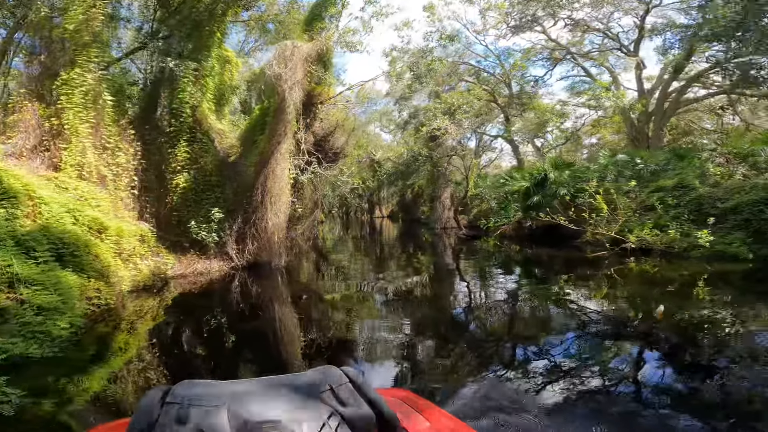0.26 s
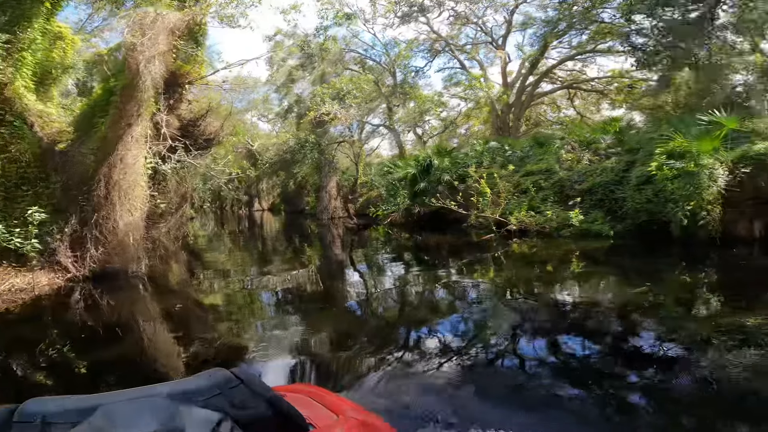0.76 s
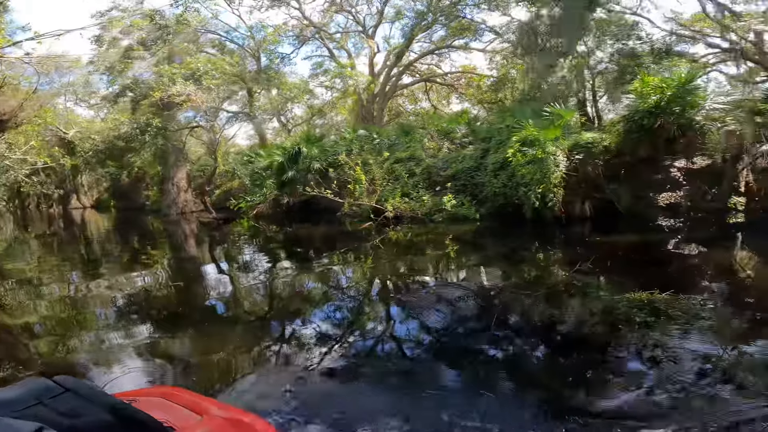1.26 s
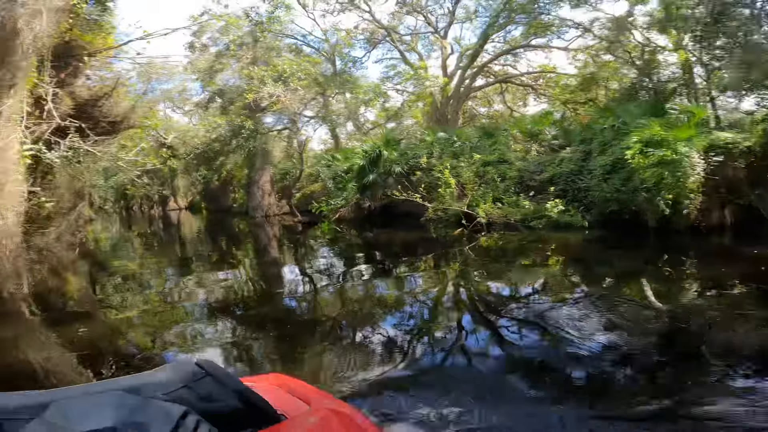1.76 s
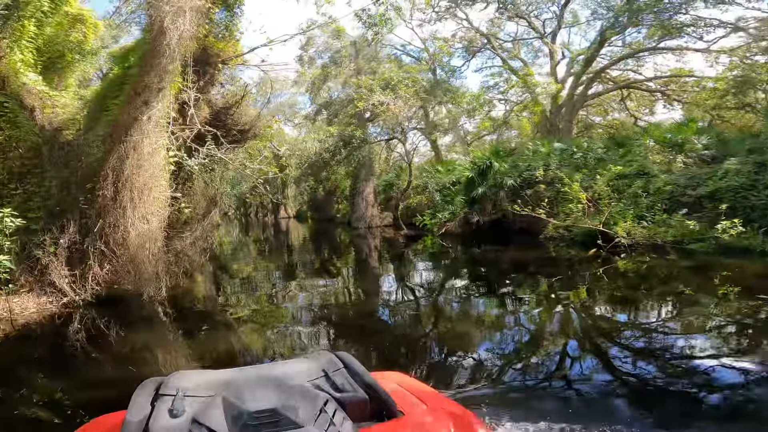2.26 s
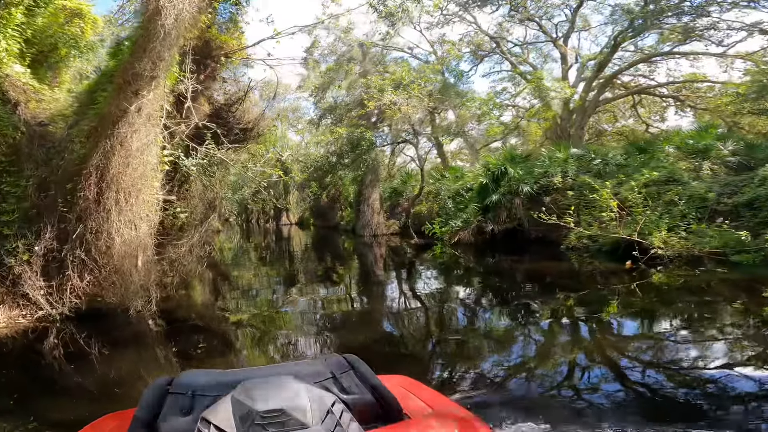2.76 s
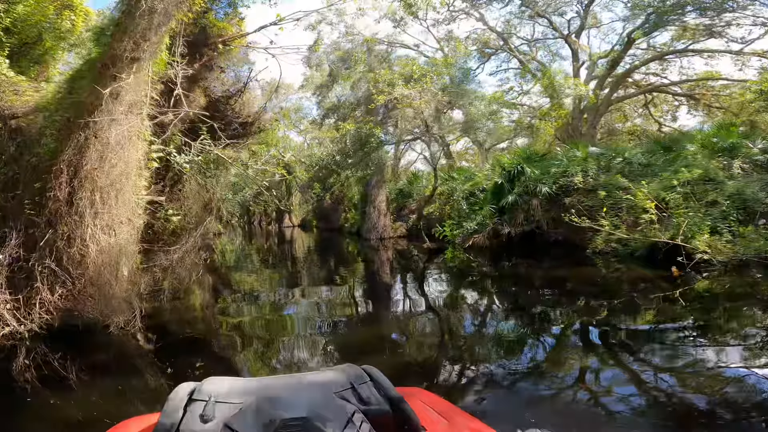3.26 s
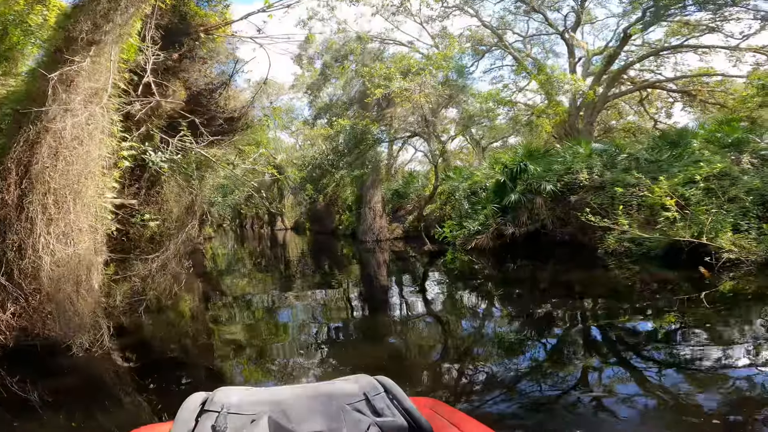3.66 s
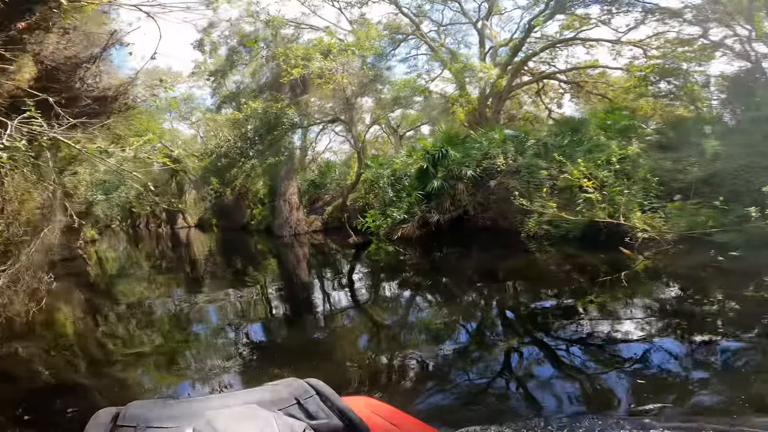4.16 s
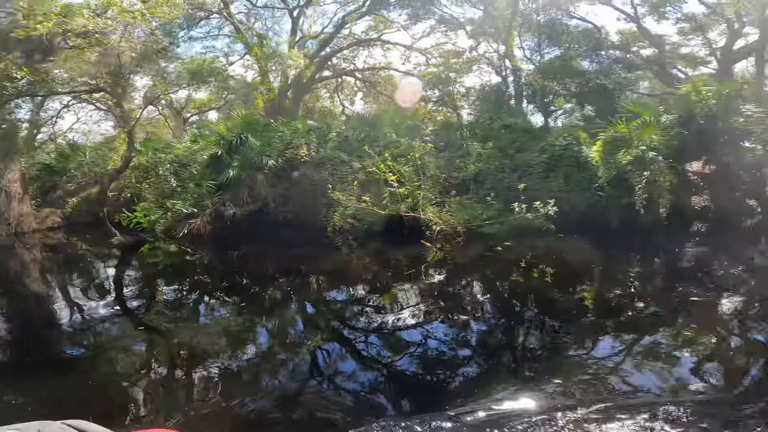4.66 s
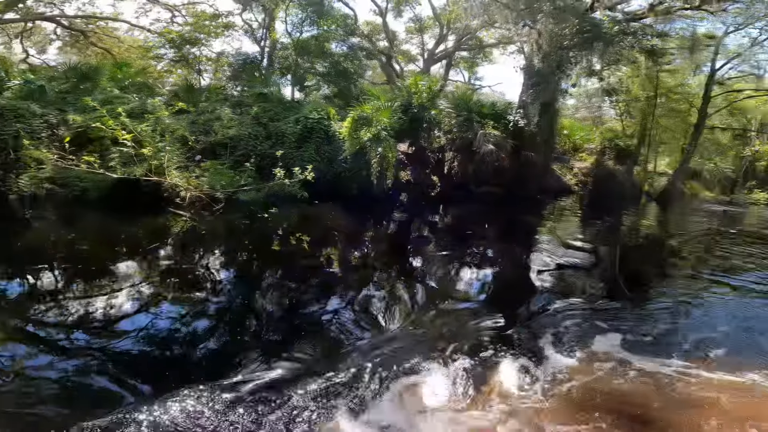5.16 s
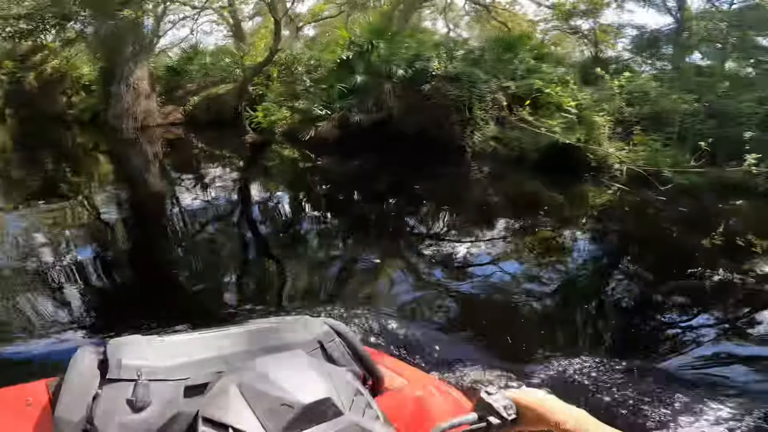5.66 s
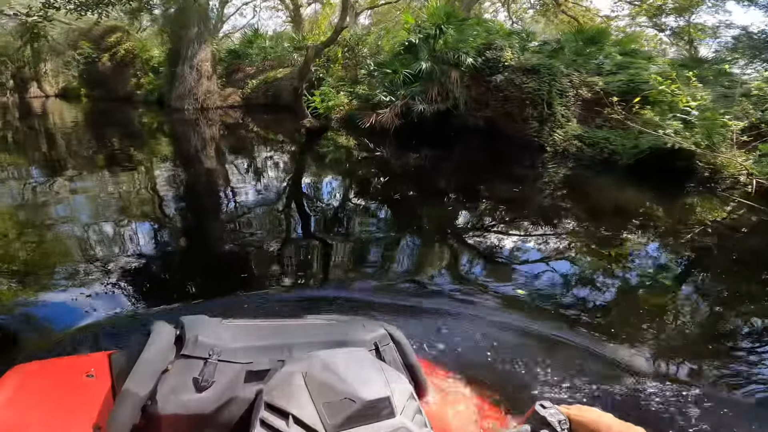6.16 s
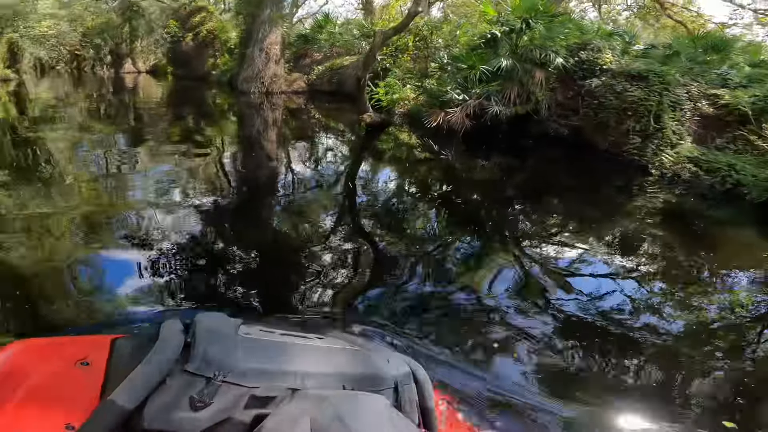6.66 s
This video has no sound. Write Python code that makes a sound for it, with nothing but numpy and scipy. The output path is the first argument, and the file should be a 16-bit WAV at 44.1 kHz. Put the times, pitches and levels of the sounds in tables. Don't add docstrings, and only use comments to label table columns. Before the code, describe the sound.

Close on-vehicle microphone outdoors. A muffled mono engine hum opens into wide stereo at about one second as a two-cylinder quad labours through deep water: rapid drowned exhaust thuds, gritty intake roar, churned water, bubbles and belt rasp. The load falls away after four seconds, leaving a quiet hum and a few hard plastic knocks; then water rushes back with tiny spray ticks and the engine revs up.

```python
import sys
import numpy as np
from scipy import signal
from scipy.fft import rfft, irfft, next_fast_len
from scipy.io import wavfile
from scipy.ndimage import uniform_filter1d, map_coordinates

SR = 44100
rng = np.random.default_rng(int(sys.argv[2]) if len(sys.argv) > 2 else 0)


def file_out(sig):
    cols = np.atleast_2d(sig).T
    lim = np.clip(cols, -1, 1)
    pcm = np.round(lim * 32767).astype(np.int16)
    wavfile.write(sys.argv[1], SR, pcm)


def invert_db(level):
    return 10 ** (np.asarray(level, dtype=float) / 20)


N = 304290

# start_s, length_s, stereo_share_change
WIND_FADES = [
    (0.898, .12, 0.79),
    (5.017, 0.47, -0.97),
    (5.623, 0.12, .9),
]
# time_s, level_db, length_s
FADE_DIPS = [
    (.96, -3, 0.13),
    (5.07, -6, 0.15),
]
# freq_hz, level_db, phase_rad, likeness_0to1
SIDE = [(40, -8, 0, .95), (110, -7, 0.0012, 0.96), (170, 0.5, -1.5, 0.76), (260, 0, -1.75, 0.93),
        (800, 1, -1.81, 1), (1600, -2.5, -1.18, .9), (2100, -9, -.9, 0.9), (2600, -9.5, -.1, 0.96),
        (4500, -1, -.1, 0.78), (8000, 2, 0, 0.95)]
# freq_hz, level_db (per Hz)
PORT_HISS = [(9000, -70), (10800, -32.5), (11600, -6.5), (12000, 1.5), (12600, 2), (13100, -12.5),
             (14200, 0.5), (15600, -8.5)]
# time_s, peak_db
DROPLETS = [(0.4885, -73.5), (0.5442, -87), (1.3457, -50.5), (3.7704, -50.5), (4.0423, -54.5),
            (5.2016, -74), (5.437, -80), (5.7956, -59), (5.9463, -55.5), (6.065, -49.5), (6.174, -48.5),
            (6.313, -62), (6.517, -43.5), (6.6014, -49.5), (6.656, -67), (6.8757, -45.5)]
# time_s, peak_db, t60_s
PANEL_KNOCKS = [
    (5.302, -48, 0.017),
    (5.415, -32, 0.025),
    (5.626, -41, 0.06),
    (5.638, -33.5, 0.06),
    (5.651, -33.5, 0.063),
    (5.662, -37, 0.013),
    (5.666, -30, 0.028),
]
# freq_hz, width_hz, level_db
PANEL_MODES = [(850, 66, -3.5), (1400, 65, 8), (1777, 140, 7), (2820, 110, -7), (4100, 500, -27)]
# freq_hz, width_hz, level_db
CASE_MODES = [(1207, 25, -2), (1442, 79, 6.5), (1544, 450, 0), (1920, 220, -5), (2593, 550, -38.5)]
# time_s, level_db, length_s
BELT_SLIPS = [
    (2.75, 3, 0.092),
    (3.48, 7.5, 0.19),
    (3.85, 8.5, .2),
    (6.8, 9, 0.47),
]
# freq_hz, level_db (per Hz)
SPRAY_COLOUR = [(1060, -14), (1800, -2.5), (2180, -8.5), (2940, -11), (4970, -22), (7650, -27.5),
                (9890, -33.5), (11000, -30), (14300, -73), (22000, -120)]
# freq_hz, level_db (per Hz)
ROAR_COLOUR = [(180, -27), (300, 0.5), (455, -4.5), (570, -2.5), (818, -6.5), (1080, -6), (1270, -10.5),
               (1510, -10), (2600, -32), (3380, -62), (5720, -120)]
# start_s, end_s, start_hz, end_hz, level_db
HOLLOWS = [(1.334, 1.762, 1031, 1052, -49.5), (1.589, 3.098, 551, 575.3, -39.5),
           (2.207, 3.098, 1518, 1522, -48.5), (3.046, 4.21, 850, 943, -38.5),
           (3.215, 3.623, 1692, 1641, -41), (3.285, 4.275, 595.4, 574, -43.5),
           (3.817, 4.307, 1509, 1508, -43), (4.21, 4.973, 1125, 1088, -56),
           (1.15, 1.367, 4730, 4520, -59.5), (6.005, 6.894, 997, 1178, -49), (6.78, 6.86, 3460, 3500, -47),
           (5.715, 5.95, 897, 850, -53)]
# time_s, pitch_hz, peak_db
BIG_BUBBLES = [(1.411, 1075, -28.5), (1.452, 1020, -39), (1.497, 1000, -34), (1.538, 1100, -41),
               (1.615, 1040, -30.5), (1.652, 1030, -27.5), (1.935, 664, -24), (1.969, 620, -27.5),
               (2.168, 757, -25), (2.285, 693, -23.5), (3.297, 890, -31), (4.361, 870, -33.5)]
# time_s, exhaust_effort_db, water_flow_db, camera_nearness_to_frame_db
RIDE_LEVELS = [(0, -31, -56.5, -33.5), (.84, -29, -59.5, -36.5), (1.02, -36, -53, -37),
               (1.2, -28, -44, -38.5), (1.5, -22, -40.5, -37), (2.04, -21, -36.5, -35.5),
               (2.9, -20.5, -35, -35.5), (3.3, -21.5, -35, -40), (4.05, -19, -33.5, -36),
               (4.3, -24.5, -39.5, -43), (4.6, -38.5, -48.5, -48), (4.95, -48, -57.5, -44.5),
               (5.25, -45, -65.5, -43.5), (5.55, -44.5, -65, -41.5), (5.86, -45.5, -46, -44),
               (6.15, -38, -39.5, -37.5), (6.5, -41.5, -37, -36), (6.9, -29.5, -33.5, -31)]
# time_s, cycle_rate_hz, firing_scatter_db (from water choking the pipe)
ENGINE_SPEED = [(0, 25.85, 1), (.65, 25.75, .9), (1.05, 26.65, .9), (1.35, 25.8, .8), (1.5, 24.9, .8),
                (2.4, 25.5, .9), (2.72, 25.9, 1.3), (2.95, 25.2, 1.3), (3.35, 20.7, 1.4), (3.7, 24, 1.3),
                (3.92, 24.9, 1.2), (4.33, 23.85, 2), (4.95, 26.65, 2.6), (5.5, 25.85, 2.6), (6, 25.55, 2.3),
                (6.45, 27, 2.1), (6.9, 29.5, 2.2)]
# time_s, level_db
WEAK_FIRINGS = [
    (2.558, -4),
    (2.678, -4.5),
    (3.328, -6),
    (3.46, -11),
    (3.629, -4),
    (4.121, -0.5),
    (4.251, -16.5),
    (4.489, -5),
    (4.531, -1.5),
]
# time_s, level_db, length_s
PIPE_GULPS = [(2.56, -1, 0.014), (2.71, 0, .03), (2.92, -0.5, 0.033), (3.2, -3.5, 0.02),
              (3.35, -3.5, 0.019), (3.44, 1.5, 0.041), (3.51, -6, 0.021), (3.63, -1, 0.02),
              (4.13, -6, 0.016), (4.25, 1, 0.022), (4.5, -2, .03), (4.57, 5.5, .03), (4.67, -4, 0.061),
              (4.8, 6.5, 0.031), (5.68, 2, 0.12), (5.77, -5.5, .03), (5.92, 5, 0.04), (6.17, -1, .03),
              (6.33, 2.5, .04), (6.48, 1, .04), (6.71, 2.5, 0.017), (6.82, -5.5, 0.053)]
# freq_hz, width_hz, level_db
PIPE_MODES = [(92, 14, -13), (146, 46, 0), (152, 31, .8)]
# freq_hz, width_hz, level_db
MOUTH_MODES = [(258, 20, 0), (335, 80, -15)]
# freq_hz, width_hz, level_db
FRAME_MODES = [(25.8, 26, -6), (60.5, 11, 6), (97, 31, -1)]

USUAL_HZ = 25.7
TOP_HZ = 15730


def unit(x):
    return x / np.sqrt(np.mean(x ** 2) + 1e-20)


def curves(rows):
    s, *cols = np.transpose(rows)
    return [np.interp(np.arange(N) / SR, s, c) for c in cols]


def along(rows, hz):
    f, *cols = np.transpose(rows)
    return [np.interp(np.log(hz + 1), np.log(f + 1), c) for c in cols]


def wobble(rate_hz):
    knots = rng.standard_normal(int(N * rate_hz / SR) + 4)
    return map_coordinates(knots, [np.arange(N) * rate_hz / SR])


def swells(rows):
    t = np.arange(N) / SR
    return sum(db * np.exp(-((t - s) / length) ** 2) for s, db, length in rows)


def filtered(x, response):
    m = next_fast_len(N + SR // 2)
    return irfft(rfft(x, m) * response(np.fft.rfftfreq(m, 1 / SR)), m)[..., :N]


def falling(hz, corner_hz, order):
    return 1 / (1 + 1j * hz / corner_hz) ** order


def modes(rows):
    def response(f):
        total = 0
        for k, (centre, width, db) in enumerate(rows):
            total = total + (-1) ** k * invert_db(db) * 1j * f * width / (centre * centre - f * f + 1j * f * width)
        return total
    return response


def colour(spectrum):
    return lambda hz: invert_db(along(spectrum, hz)[0])


def rush(response, patchy_db):
    z = signal.stft(rng.standard_normal((2, N)), nperseg=512)[2]
    field = rng.standard_normal(z.shape[1:])
    for axis in (0, 1):
        field = uniform_filter1d(field, size=5, axis=axis)
    patched = signal.istft(z * invert_db(patchy_db * unit(field)), nperseg=512)[1][:, :N]
    return unit(filtered(patched, response))


def controls():
    effort_db, flow_db, near_db = curves(RIDE_LEVELS)
    return effort_db + 20, flow_db + 36, near_db + 36


def crank_turn():
    return np.cumsum(curves(ENGINE_SPEED)[0]) / SR + .28


def openness():
    t = np.arange(N) / SR
    share = sum(step * np.clip((t - s) / length, 0, 1) for s, length, step in WIND_FADES)
    return np.clip(share, 0, 1)


def stereo(pair):
    def turned(hz):
        db, phase, alike = along(SIDE, hz)
        alike = np.clip(alike, 0, 1)
        return invert_db(db) * np.exp(1j * phase) * [alike, np.sqrt(1 - alike ** 2)]
    side = openness() * filtered(pair, turned).sum(axis=0)
    return np.array([pair[0] + side, pair[0] - side])


def port():
    effort, flow, near = controls()
    hiss_db = -70 + .7 * near - .15 * effort + .8 * wobble(8.3) + 1.2 * wobble(60)
    hiss = invert_db(hiss_db) * rush(colour(PORT_HISS), patchy_db=1.5)
    gate, t = np.zeros(N + SR), np.arange(SR // 20) / SR
    for s, db in DROPLETS:
        gate[round(s * SR):][:len(t)] += invert_db(db - 60 * t / 0.016)
    crisp = lambda f: f / 9000 / (1 + 1j * (f / 9000) ** 1.5) * (f > 5000)
    ticks = unit(filtered(rng.standard_normal((2, N)), crisp)) * gate[:N]
    return (hiss + ticks) * invert_db([[6], [-6]])


def knocks():
    blows, t = np.zeros(N + SR), np.arange(SR // 10) / SR
    for s, db, t60 in PANEL_KNOCKS:
        rattle = 0.19 * rng.standard_normal(len(t)) * invert_db(-60 * t / np.clip(t60, .005, .06))
        rattle[0] = 1
        blows[round(s * SR):][:len(t)] += invert_db(db + 25.5) * rattle
    panel = lambda f: modes(PANEL_MODES)(f) * falling(f, 2800, order=3) * (1 - falling(f, 640, order=1)) ** 2
    return filtered(blows[:N], panel)


def belt_case(beat):
    effort, flow, near = controls()
    idle_db = near - 34 - 18
    strain_db = -52 + 2.2 * flow + 0.72 * near + swells(BELT_SLIPS)
    bright = lambda f: (f / 1200) ** 2 / (1 + (f / 1200) ** 2)
    shell = lambda f: modes(CASE_MODES)(f) * bright(f) * falling(f, 2700, order=3)
    rasp = rush(shell, patchy_db=1.2)[0] * (.85 + .15 * beat) * invert_db(.8 * wobble(30))
    return invert_db(-4.5) * np.hypot(invert_db(idle_db), invert_db(strain_db)) * rasp


def plops():
    out, t = np.zeros(N + SR), np.arange(SR // 10) / SR
    for s, hz, db in BIG_BUBBLES:
        envelope = invert_db(db - 60 * t / 0.04) * (1 - np.exp(-t / 0.00074))
        out[round(s * SR):][:len(t)] += envelope * np.sin(2 * np.pi * hz * t * (1 + 2.2 * t))
    return out[:N] * [[1], [0]]


def singing_hollows(beat):
    out, t = np.zeros(N), np.arange(N) / SR
    for start, end, start_hz, end_hz, db in HOLLOWS:
        width_hz = .04 * start_hz * (1 + (start_hz / 2596) ** 3)
        u = np.clip((t - start) / (end - start), 0, 1)
        phase = 2 * np.pi * np.cumsum(start_hz + (end_hz - start_hz) * u) / SR
        phase += 3 * wobble(width_hz / 2)
        steady = .4
        band = (steady + wobble(width_hz)) * np.cos(phase) + wobble(width_hz) * np.sin(phase)
        out += invert_db(db) * (0.48 + 0.18 * beat) * np.sqrt(np.sin(np.pi * u).clip(0)) * band
    return out * [[1], [0]]


def bow_spray(beat):
    effort, flow, near = controls()
    lead_s = 0.048
    ahead = np.interp(np.arange(N) + lead_s * SR, np.arange(N), flow)
    level_db = -50 + 0.91 * ahead + .15 * near
    swell = invert_db(2.5 + 0.15 * wobble(14) + 0.92 * wobble(35))
    spray = rush(colour(SPRAY_COLOUR), patchy_db=1.5) * (0.88 + 0.087 * beat) * swell
    dull = filtered(spray, lambda f: 1 / (1 + (f / 5600) ** 12))
    bright = invert_db(0.53 * np.minimum(level_db + 62.5, 0))
    return invert_db(level_db) * (dull + bright * (spray - dull))


def bubbles():
    turn, count, length = crank_turn(), 540, 1500
    chance = rng.standard_normal((count, 4))
    angle = np.arange(count) // 3 + .3 + .12 * chance[:, 0]
    start = np.interp(angle, turn, np.arange(N)).astype(int)
    heard = ((angle < turn[-1]) & (angle > turn[0]))[:, None]
    hz = 850 * np.exp(.35 * chance[:, 1:2])
    cycles = 7.2
    u = np.arange(length) / SR * hz / cycles
    envelope = np.exp(-3 * u) * (1 - np.exp(-12 * u))
    ring = np.sin(2 * np.pi * cycles * u * (1 + 0.074 * u)) * envelope * heard
    size = invert_db(1 + 3 * chance[:, 2:3])
    at = start[:, None] + np.arange(length)
    return np.bincount(at.ravel(), (size * ring).ravel(), N + length)[:N] * [[1], [0]]


def intake_roar(beat):
    level_db = controls()[1] - 36 + swells(FADE_DIPS)
    breath = unit(rush(colour(ROAR_COLOUR), patchy_db=1.0) * (1.3 + 0.11 * beat))
    roar = breath * invert_db(-1 + 0.75 * wobble(14) + 0.38 * wobble(40))
    return invert_db(level_db) * (roar + bubbles())


def engine_levels():
    effort, flow, near = controls()
    gulp = swells(PIPE_GULPS)
    labour = 5.5 * np.tanh(np.clip(25.5 - curves(ENGINE_SPEED)[0], 0, None))
    bark = -38 + 0.77 * flow + 0.3 * effort + 1.6 * gulp + labour + swells(FADE_DIPS)
    return effort - 20 + gulp, near - 36 + 0.39 * gulp, bark


def firings(turn, rough_db, gap, second_db, jitter_ms):
    cycle = np.arange(int(turn[-1]) + 1)
    angle = np.sort(np.r_[cycle, cycle + gap])
    when = np.interp(angle, turn, np.arange(N))
    chance = rng.standard_normal((600, 2))[:len(angle)]
    rough = rough_db[when.astype(int)]
    size_db = np.tile([0, second_db], len(cycle)) + rough * chance[:, 0]
    for s, db in WEAK_FIRINGS:
        size_db += db * np.exp(-((when / SR - s) / 0.012) ** 2)
    at = np.clip((angle / USUAL_HZ + jitter_ms * rough * chance[:, 1] / 1000) * SR, 0, N - 1)
    return np.bincount(at.astype(int), invert_db(size_db), N)


def engine():
    exhaust_db, thrum_db, bark_db = engine_levels()
    rough_db = curves(ENGINE_SPEED)[1]
    turn = crank_turn()
    fire = firings(turn, rough_db, gap=.43, second_db=-6.7, jitter_ms=.1)
    crank = lambda x: np.interp(turn * SR / USUAL_HZ, np.arange(N), x)
    puff = crank(filtered(fire, lambda f: falling(f, 45, order=2)))
    beat = puff / puff.mean()

    def drowned(f):
        favour = 1 + 0.22 * np.exp(-((f - 126) / 14) ** 2) + 0.83 * np.exp(-((f - 186) / 24) ** 2)
        return favour / (1 + (f / 205) ** 9)

    thin = lambda f, corner_hz: (1 - falling(f, corner_hz, order=1)) ** 3
    pipe = lambda f: modes(PIPE_MODES)(f) * thin(f, 96) * falling(f, 400, order=4) * drowned(f)
    mouth = lambda f: modes(MOUTH_MODES)(f) * thin(f, 180) * falling(f, 600, order=3)
    frame = lambda f: -modes(FRAME_MODES)(f) * falling(f, 73, order=4) * (1 - falling(f, 9.8, order=1))
    total = np.zeros((2, N))
    for response, level_db, noise_db in [(pipe, exhaust_db, -24), (mouth, bark_db, -15), (frame, thrum_db, -17)]:
        gurgle = invert_db(noise_db + 4 * rough_db)
        clean = unit(crank(filtered(fire, response))) * [[1], [0]]
        noise = rush(response, patchy_db=2) * (0.65 + 1.02 * beat) * [[1], [.6]]
        total += invert_db(level_db) * (clean + gurgle * noise) / np.sqrt(1 + gurgle ** 2)
    return total, beat


def scene():
    thud, beat = engine()
    water = bow_spray(beat) + singing_hollows(beat) + plops()
    plastic = belt_case(beat) + knocks()
    lean = .2 * openness()
    plastic = plastic * np.array([1 + lean, 1 - lean])
    return port() + plastic + stereo(water + intake_roar(beat) + thud)


def low_pass(x):
    return signal.sosfilt(signal.butter(12, 15730, fs=SR, output="sos"), x)


def record(dry):
    fade_in = np.minimum(np.arange(N) / (.002 * SR), 1)
    held = fade_in * dry / (1 + np.abs(dry / .5) ** 5) ** (1 / 5)
    mic = lambda f: (1 - .9 * np.exp(-((f - 10750) / 500) ** 2)) * (f < TOP_HZ)
    return low_pass(filtered(held, mic))


dry = scene()
out = record(dry)
file_out(out)
```